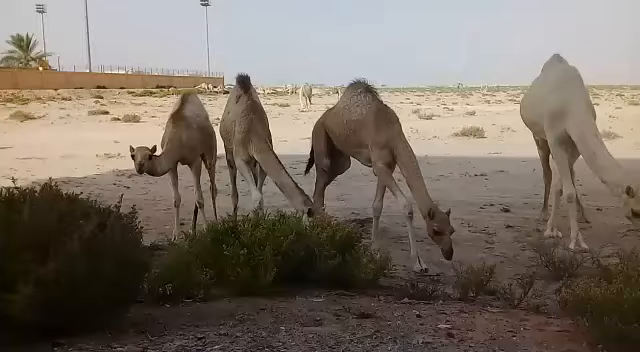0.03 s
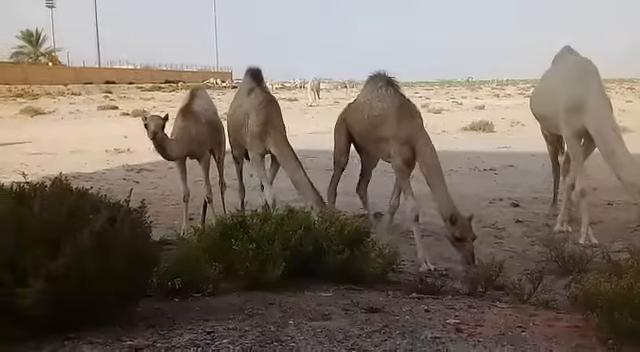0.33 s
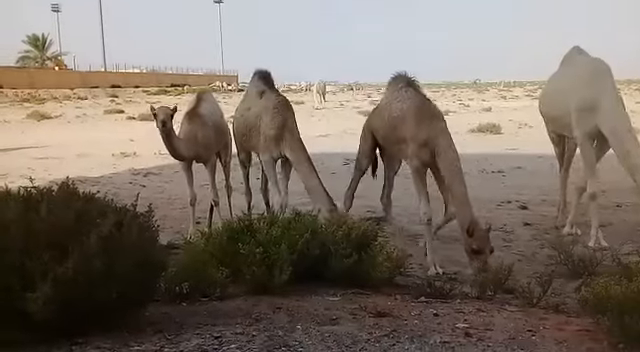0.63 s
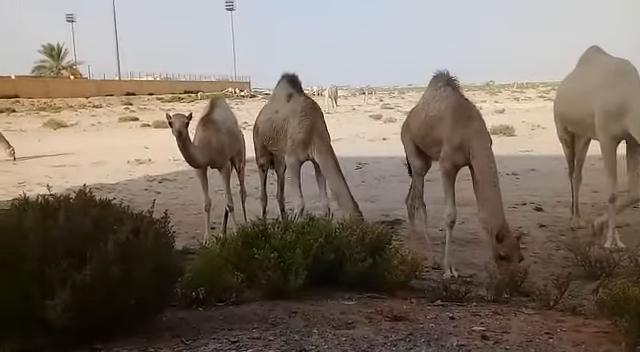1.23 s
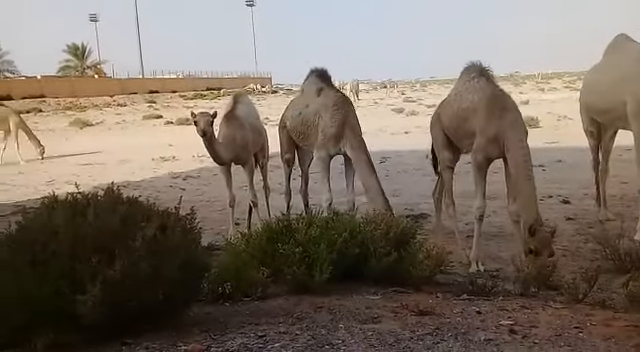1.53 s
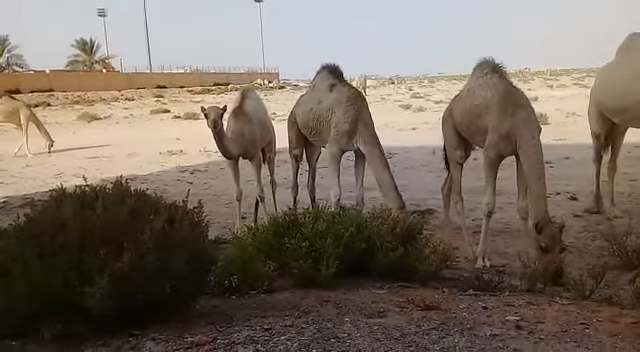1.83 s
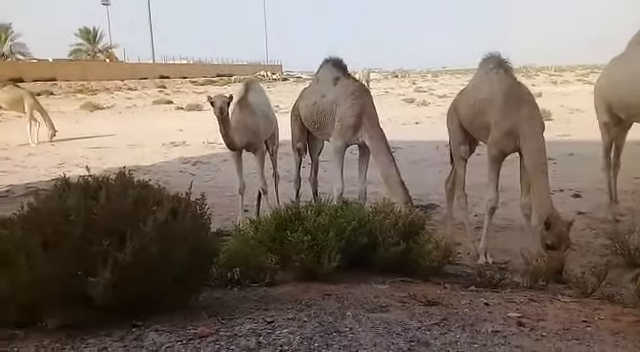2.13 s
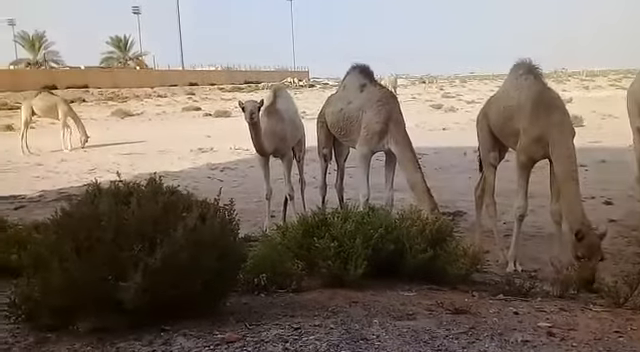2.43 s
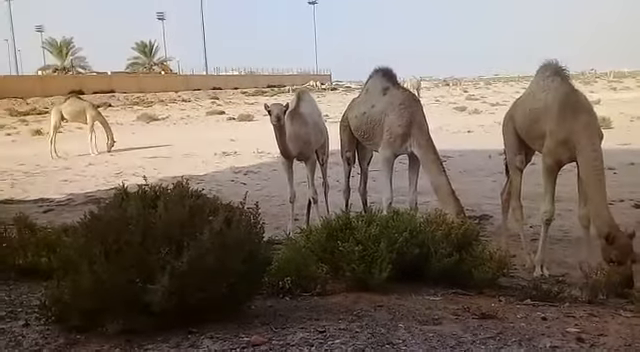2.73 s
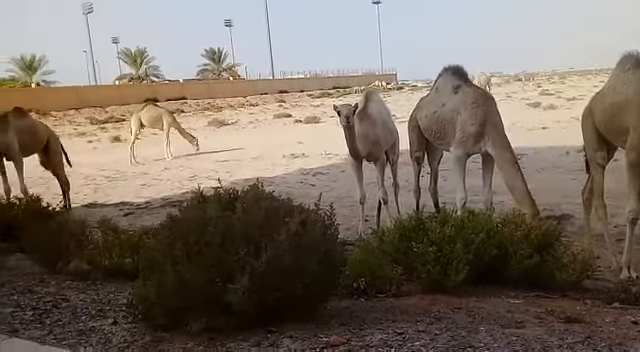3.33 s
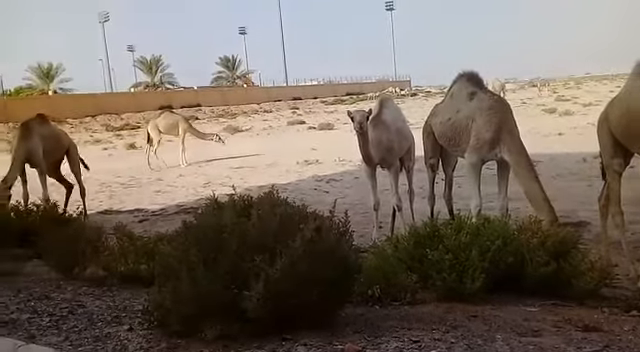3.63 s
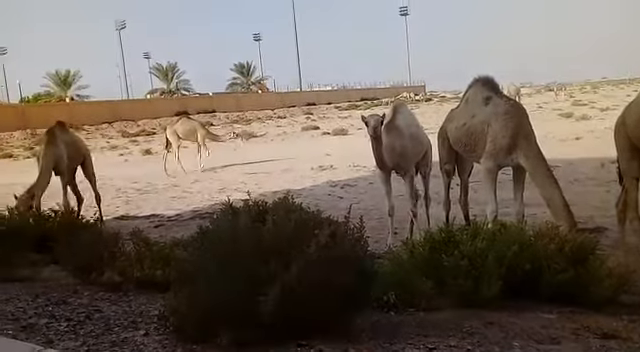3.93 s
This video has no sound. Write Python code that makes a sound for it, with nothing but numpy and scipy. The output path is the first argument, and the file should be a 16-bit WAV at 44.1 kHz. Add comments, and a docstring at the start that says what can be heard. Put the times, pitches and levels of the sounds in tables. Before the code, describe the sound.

Distant engines drone with a low rumble across an open desert lot, under softly rushing air. Far birds twitter, and a small bird whistles a short phrase near the end. The sound is dull and nearly mono.

```python
"""An open desert lot, where distant engines drone: a low rumble and a few tones under a soft rush of air.
Far birds twitter and trill, a small bird whistles one short phrase of gliding notes with a thin echo,
and grazing camels rustle the twigs of the scrub. The sound fades in after a moment of silence.
It is nearly mono and dull above 3 kHz, over faint microphone hiss."""
import sys
import numpy as np
from scipy import signal
from scipy.fft import rfft, irfft
from scipy.io import wavfile
from scipy.ndimage import uniform_filter1d

SR = 44100
rng = np.random.default_rng(int(sys.argv[2]) if len(sys.argv) > 2 else 0)


def inscribe(sig):
    """Save sig as 16-bit PCM at rate SR to the path in sys.argv[1].

    A 1-D sig is mono; a 2-D sig holds one channel per row.
    Samples are clipped to [-1, 1] before scaling.
    """
    pcm = np.round(np.clip(np.atleast_2d(sig).T, -1, 1) * 32767)
    wavfile.write(sys.argv[1], SR, pcm.astype(np.int16))


N = 176400
T = np.arange(N) / SR

# Spectra of the noise sources. Each row: frequency in Hz, relative spectral density in dB.
RUMBLE_SPECTRUM = [(10, -35), (22, -18), (35, -8.5), (50, -5), (66, -3), (95, -3.5), (110, -0.5),
                   (145, -.5), (190, -2.5), (215, -3.5), (250, -1), (280, -6), (320, -5), (345, -7),
                   (385, -6.5), (450, -11), (570, -11.5), (700, -19), (1200, -40.5), (3000, -71)]
AIR_SPECTRUM = [(100, -32), (450, -12), (700, -3), (1000, 1), (1170, .5), (1400, -2), (1750, 0.5),
                (2000, -1), (2150, -4), (2550, -3.5), (2750, -10), (2920, -13.5), (3080, -25), (3400, -29),
                (4500, -34), (7000, -73)]
TWITTER_SPECTRUM = [(2800, -49), (3550, -14), (3900, -6.5), (4400, 0), (4800, -2.5), (5200, -3.5),
                    (5700, -12.5), (6500, -23.5), (9000, -47)]
TRILL_SPECTRUM = [(3300, -40), (3650, -16), (3780, 0.5), (4020, -2.5), (4200, -12), (4700, -48)]
HISS_SPECTRUM = [(500, -34), (2500, -19.5), (4000, -8), (6500, 0), (9000, 0.3), (12000, 1.8), (15500, 0.5)]
# Envelopes of the sources, ahead of the fade-in. Each row: time in seconds, level in dB.
HUM_ENVELOPE = [(.6, -52), (1.6, -50.5), (2.4, -50.5), (3.1, -48), (4, -45.5)]
AIR_ENVELOPE = [(.5, -50), (1.2, -50), (2.2, -49.5), (3, -49), (3.5, -48), (4, -48)]
TWITTER_ENVELOPE = [(.45, -71.5), (.62, -81), (.8, -75), (1.05, -80.5), (1.2, -75), (1.29, -72),
                    (1.38, -79.5), (1.52, -80.5), (1.65, -78), (1.76, -78.5), (2.24, -73), (2.44, -72),
                    (2.6, -72), (3.15, -70.5), (3.35, -71.5), (3.6, -72.5), (3.9, -74)]
TRILL_ENVELOPE = [(.45, -73), (.65, -81), (.72, -72), (1.15, -77), (1.5, -92), (1.68, -79), (2.1, -90),
                  (2.6, -86), (3.1, -77), (3.55, -79), (3.68, -71.5), (4, -74)]
# Weaker spectral lines of the engines. Each row: frequency in Hz, rms level in dB.
ENGINE_TONES = [(65, -58), (81, -52), (97, -55.5), (126.5, -53), (190, -59.5), (244, -58.5), (315, -61.5),
                (494.5, -63), (571, -68.5), (994, -69), (1043.5, -69.5), (1379, -73.5), (1477, -72),
                (2307, -73.5), (2374.5, -71), (2472, -72.5), (2637, -73)]
# The small bird's phrase. Each row: start and length in seconds, first, middle and last frequency in Hz,
# level in dB.
BIRD_NOTES = [(1.148, 0.044, 5070, 4880, 4700, -72), (1.263, 0.052, 4800, 5030, 4800, -78),
              (2.67, .036, 4280, 4820, 5400, -67.5), (2.703, 0.021, 5230, 4550, 4300, -60.5),
              (2.727, .034, 4580, 4270, 3840, -64), (2.761, .028, 3990, 4420, 4680, -54),
              (2.785, 0.041, 4900, 5100, 5860, -70), (2.842, 0.026, 3910, 3790, 3500, -62),
              (2.92, 0.018, 4130, 4530, 5240, -62), (2.938, .026, 5510, 5680, 5250, -65.5),
              (2.955, 0.024, 5060, 4570, 4300, -56.5), (3.021, 0.035, 3750, 4300, 4650, -55.5),
              (3.042, 0.024, 5380, 5480, 4900, -67.5), (3.12, .022, 3980, 3870, 3850, -63.5)]
# Rustles in the scrub. Each row: start and length in seconds, level in dB, centre in Hz, width in octaves.
TWIG_RUSTLES = [(2.116, .025, -73, 15500, .1), (2.428, 0.093, -72.5, 3930, .3),
                (3.437, 0.039, -67, 4840, 0.24), (3.762, 0.025, -65.5, 4150, .1)]
# The fade-in. Each row: time in seconds, gain in dB.
FADE_IN = [(.41, -26.5), (.45, -17), (.5, -11.5), (.56, -7.5), (.64, -3)]


def amp(db):
    """Amplitude grows tenfold with every 20 dB."""
    return 10 ** (np.asarray(db) / 20)


def unit_rms(x):
    """Normalisation to an rms of 1."""
    return x / np.sqrt(np.mean(x ** 2) + 1e-20)


def envelope(points):
    """Gain over time, by linear interpolation in decibels."""
    return amp(np.interp(T, *np.transpose(points)))


def add(mix, start_s, sound):
    """Superposition of a sound on the mix from a given time."""
    part = mix[round(start_s * SR):][:len(sound)]
    part += sound[:len(part)]


def drift(rate_hz):
    """Low-pass filtered noise gives a random fluctuation of rms 1."""
    hz = np.fft.rfftfreq(N, 1 / SR)
    low_pass = np.exp(-(hz / rate_hz) ** 2) * (hz > 0)
    return unit_rms(irfft(rfft(rng.standard_normal(N)) * low_pass, N))


def noise(spectrum):
    """Spectral shaping of white noise gives steady coloured noise of rms 1."""
    hz, db = np.transpose(spectrum)
    gain = amp(np.interp(np.log(np.fft.rfftfreq(N, 1 / SR) + 1), np.log(hz), db))
    return unit_rms(irfft(rfft(rng.standard_normal(N)) * gain, N))


def patchy(x, depth_db, bins, frames):
    """Random amplitude modulation makes patches of the spectrogram swell and sink."""
    spectrogram = signal.stft(x, nperseg=512, noverlap=384)[2]
    field = rng.standard_normal(spectrogram.shape[::-1]).T
    field = unit_rms(uniform_filter1d(uniform_filter1d(field, bins, 0), frames, 1))
    modulated = spectrogram * amp(depth_db * field)
    return unit_rms(signal.istft(modulated, nperseg=512, noverlap=384)[1][:N])


def engines(rumble_db=-43, hum_hz=162.4, hum_wander_hz=0.38, wander_hz=0.89, waver_db=2.5):
    """Spectral lines over a noise rumble: a growing hum, and tones that waver on their way through air."""
    out = amp(rumble_db) * noise(RUMBLE_SPECTRUM)
    hum_cycles = np.cumsum(hum_hz + hum_wander_hz * drift(rate_hz=2.07)) / SR
    out += envelope(HUM_ENVELOPE) * unit_rms(np.sin(2 * np.pi * hum_cycles))
    for hz, db in ENGINE_TONES:
        cycles = np.cumsum(hz + wander_hz * drift(rate_hz=3.18)) / SR + rng.random()
        waver = amp(waver_db * drift(rate_hz=1.63))
        out += amp(db) * unit_rms(waver * np.sin(2 * np.pi * cycles))
    return out


def air():
    """Moving air radiates broadband noise, a soft rush that slowly grows."""
    return envelope(AIR_ENVELOPE) * patchy(noise(AIR_SPECTRUM), depth_db=0.64, bins=8, frames=24)


def far_birds(pulse_hz=28, pulse_depth_db=2):
    """Distance blurs twitter into a band of noise; amplitude modulation of a narrower band is a trill."""
    twitter = patchy(noise(TWITTER_SPECTRUM), depth_db=2.0, bins=5, frames=14)
    cycles = np.cumsum(pulse_hz * (1 + .25 * drift(rate_hz=8.3))) / SR
    pulses = amp(pulse_depth_db * np.sin(2 * np.pi * cycles))
    trill = unit_rms(noise(TRILL_SPECTRUM) * pulses)
    return envelope(TWITTER_ENVELOPE) * twitter + envelope(TRILL_ENVELOPE) * trill


def small_bird(roughness=0.029, echo_db=-4.5, echo_t60_s=0.64):
    """Frequency modulation roughens whistled glides; convolution with decaying noise gives the echo."""
    song = np.zeros(N)
    for start, length, first_hz, middle_hz, last_hz, db in BIRD_NOTES:
        progress = np.linspace(0, 1, round(length * SR))
        glide_hz = np.polyval(np.polyfit([0, .5, 1], [first_hz, middle_hz, last_hz], 2), progress)
        hz = glide_hz * (1 + roughness * drift(rate_hz=500)[:len(progress)])
        whistle = np.sin(2 * np.pi * np.cumsum(hz) / SR)
        add(song, start, amp(db) * unit_rms(np.sin(np.pi * progress) * whistle))
    tail = rng.standard_normal(SR) * amp(-60 * T[:SR] / echo_t60_s)
    echo = signal.fftconvolve(song, tail / np.linalg.norm(tail))[:N]
    return song + amp(echo_db) * echo


def scrub():
    """Dry twigs moved by grazing camels emit transients: brief bursts of band-limited noise."""
    out, hz = np.zeros(N), np.fft.rfftfreq(N, 1 / SR) + 1
    for start, length, db, centre_hz, octaves in TWIG_RUSTLES:
        progress = np.linspace(0, 1, round(length * SR))
        band = np.exp(-.5 * (np.log2(hz / centre_hz) / octaves) ** 2)
        crunch = irfft(rfft(rng.standard_normal(N)) * band, N)[:len(progress)]
        burst = np.sin(np.pi * progress ** 0.42)  # quick rise, slower fall
        add(out, start, amp(db) * unit_rms(crunch * burst))
    return out


def scene():
    """The sources superpose; equal signals in both channels place them in the centre."""
    return np.tile(engines() + air() + far_birds() + small_bird() + scrub(), (2, 1))


def record(dry, hiss_db=-74.5, hiss_correlation=.25, start_s=.408, cutoff_hz=15830):
    """Partly correlated microphone hiss joins the sound; the sum fades in and is low-pass filtered."""
    common = np.sqrt(hiss_correlation) * noise(HISS_SPECTRUM)
    separate = np.sqrt(1 - hiss_correlation) * np.array([noise(HISS_SPECTRUM), noise(HISS_SPECTRUM)])
    onset = np.clip((T - start_s) / 0.0069, 0, 1)
    faded = (dry + amp(hiss_db) * (common + separate)) * envelope(FADE_IN) * onset
    low_pass = signal.firwin(511, cutoff_hz, window=("kaiser", 9), fs=SR)
    return signal.oaconvolve(faded, low_pass[None], "same")


dry = scene()
out = record(dry)
inscribe(out)
```